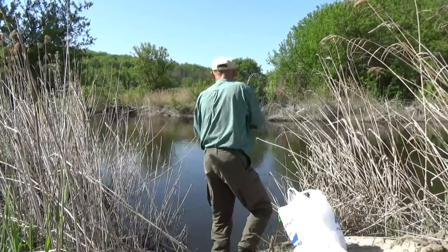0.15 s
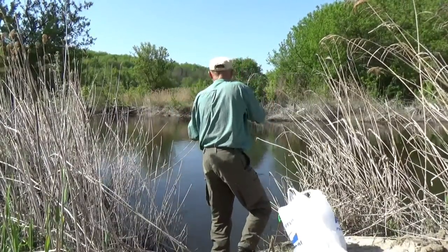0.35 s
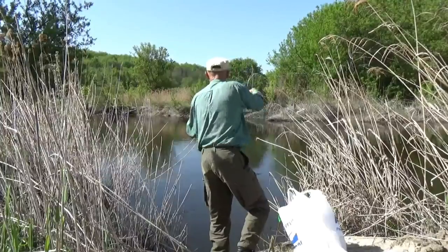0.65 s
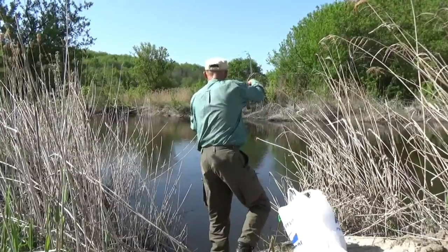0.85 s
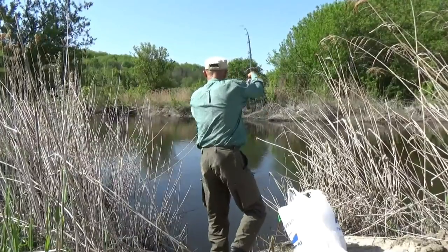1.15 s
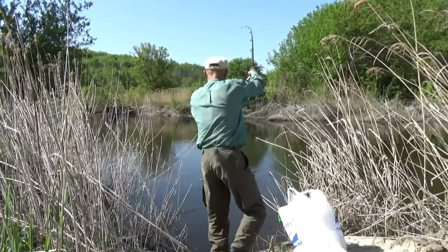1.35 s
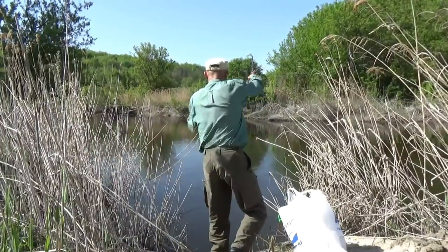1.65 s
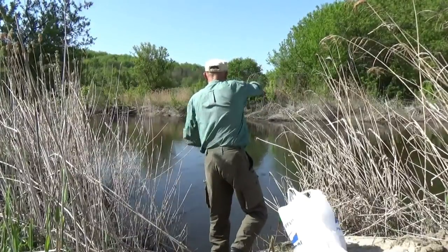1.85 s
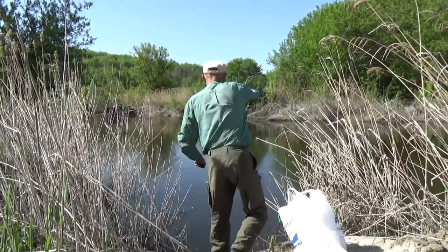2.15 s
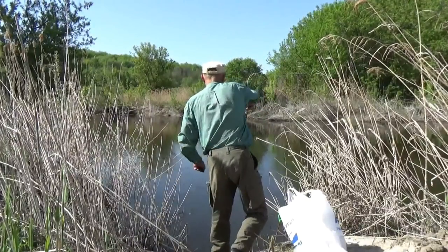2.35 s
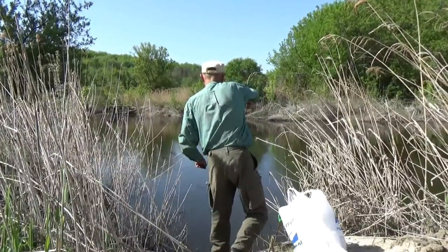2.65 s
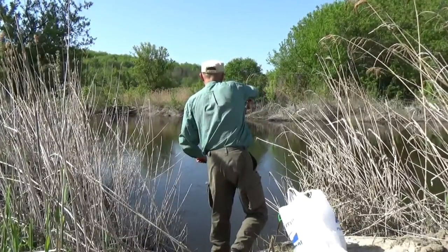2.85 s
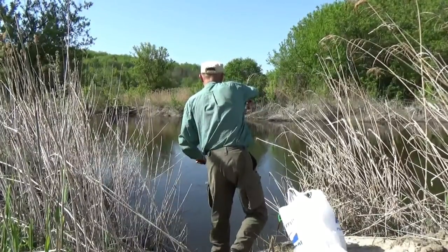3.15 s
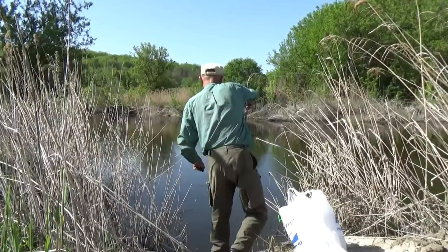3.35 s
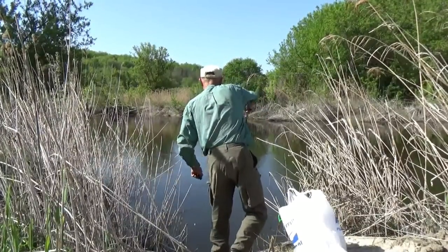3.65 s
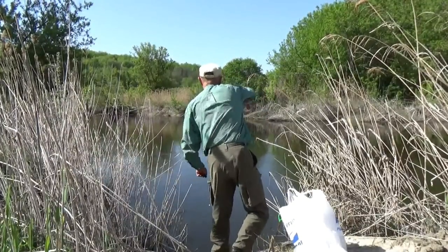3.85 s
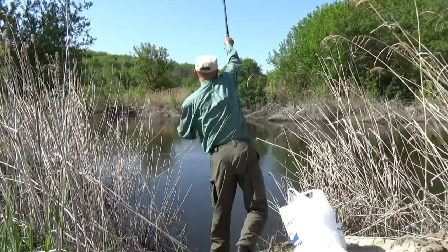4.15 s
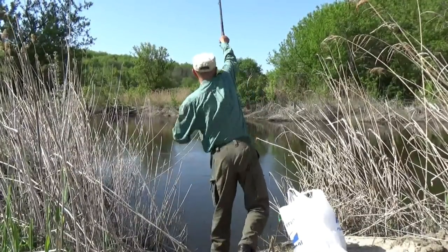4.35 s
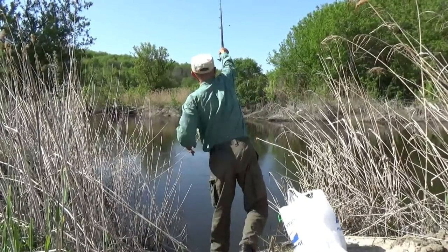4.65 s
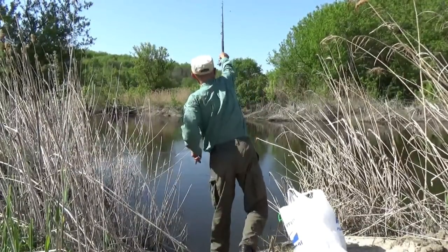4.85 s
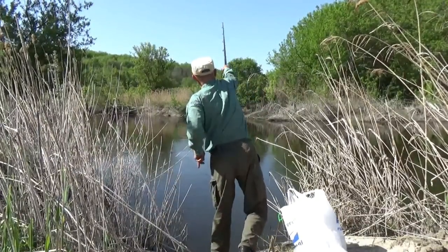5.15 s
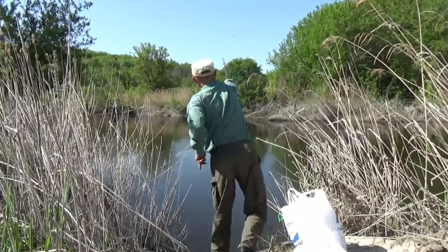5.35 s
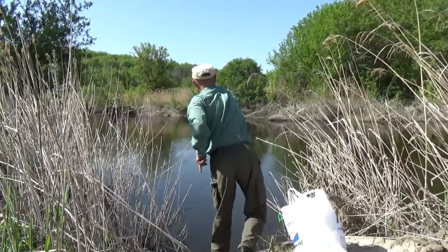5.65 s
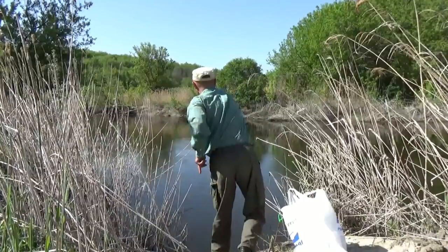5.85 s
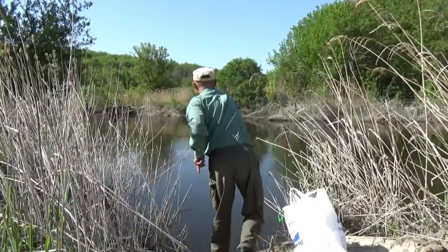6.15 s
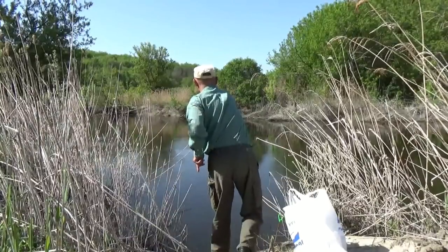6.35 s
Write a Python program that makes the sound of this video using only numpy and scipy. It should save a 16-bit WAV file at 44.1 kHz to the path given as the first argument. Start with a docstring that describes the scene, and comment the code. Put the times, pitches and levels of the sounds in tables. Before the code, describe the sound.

Faint chirps and a repeated piping bird call carry across a calm river, with a few ticks of dry reeds and low gusts on the microphone. Past the middle, a soft rod swish leads into the loudest sound, a nearby fishing reel clicking and rattling as line hisses off in spurts. It eases off into small water splashes, low thumps and plops near the bank.

```python
"""Birds chirp and pipe across a quiet river, over leaves, far water and light wind rumbling on the microphone.
Dry reeds tick and a few dull knocks sound. Near 4 s an angler strikes: the rod swishes up through the air,
and line rips off a clicking reel in bursts that shake its body. As the spool slows, its ring gives way to
splashing water, and bubbles plop near the bank."""
import sys
import numpy as np
from scipy import signal
from scipy.fft import rfft, irfft, next_fast_len
from scipy.io import wavfile
from scipy.ndimage import uniform_filter1d

SR = 44100
rng = np.random.default_rng(int(sys.argv[2]) if len(sys.argv) > 2 else 0)


def output_pcm(signal):
    """Save a mono or channel-first signal as 16-bit PCM at the path in sys.argv[1].

    Samples are clipped to [-1, 1] before scaling.
    """
    pcm = np.clip(np.atleast_2d(signal).T, -1, 1) * 32767
    wavfile.write(sys.argv[1], SR, np.round(pcm).astype(np.int16))


N = 287223
T = np.arange(N) / SR


def undb(db):
    return 10 ** (np.asarray(db) / 20)


def unit(x):
    return x / np.sqrt(np.mean(x ** 2))


def noise():
    return rng.standard_normal(N)


def curve(rows, off=-120):
    """One automation curve per level column; `off` dB outside the table's span."""
    times, *columns = np.transpose(rows)
    return [np.interp(T, times, column, left=off, right=off) for column in columns]


def colour(x, points):
    """EQ through (f/Hz, level/dB) points; white noise keeps its power."""
    hz, db = np.transpose(points)
    size = next_fast_len(N)
    bin_hz = np.arange(size // 2 + 1) * SR / size
    gain = undb(np.interp(np.log(bin_hz + 1), np.log(hz), db))
    return irfft(rfft(x, size) * unit(gain), size)[:N]


def band(x, lo_hz, hi_hz):
    return signal.sosfilt(signal.butter(2, [lo_hz, hi_hz], "band", fs=SR, output="sos"), x)


def ring(x, modes):
    """Parallel resonators of alternating polarity."""
    return sum((-1) ** k * undb(db) * signal.lfilter(*signal.iirpeak(hz, hz / width, SR), x)
               for k, (hz, width, db) in enumerate(modes))


def walk(rate):
    """Random modulator: slews to a new value `rate` times a second."""
    hold = int(SR / rate)
    return 0.71 * uniform_filter1d(np.repeat(rng.standard_normal(N // hold + 1), hold), hold)[:N]


def decays(times, db, t60):
    """Envelope that jumps at each time and dies away; overlaps add in power."""
    kicks = np.zeros(N)
    np.add.at(kicks, (np.asarray(times) * SR).astype(int), undb(2 * np.asarray(db)))
    return np.sqrt(signal.lfilter([1], [1, -np.exp(-2 * np.log(1000) / (t60 * SR))], kicks))


def wide(x, side_db):
    """Stereo spread: a delayed, flickering copy is added left and subtracted right."""
    side = undb(side_db) * walk(150) * np.roll(band(x, 300, 16000) + 0.5 * band(x, 2200, 9100), 30)
    return np.array([x + side, x - side])


def air():
    """A bed of leaves, far water and microphone hiss; a band near 1 kHz flutters."""
    # tone of the bed: f/Hz, level/dB
    spectrum = [(18, -47), (30, -30), (91, -6), (458, -0.5), (752, -2.5), (1040, -3), (1230, -5),
                (1360, -5), (2410, -8.5), (2660, -6.5), (4940, -11.5), (9890, -10), (11200, -13.5),
                (14600, -47), (22000, -120)]
    # treble ride: t/s, level/dB
    treble_ride = [(0.0, 3.5), (0.4, -.5), (1.25, 3), (1.7, -.5), (4.4, 0)]
    mid, side = (colour(noise(), spectrum) for _ in range(2))
    flutter = undb(-13 + 2.1 * walk(40)) * unit(band(noise(), 1003, 1058))
    bed = mid + flutter + undb(-12) * side * np.array([[1], [-1]])
    lift = undb(np.interp(T, *np.transpose(treble_ride))) - 1
    treble = lift * np.array([band(channel, 3800, 17000) for channel in bed])
    return undb(-55.5) * (undb(0.15 * walk(3.56)) * bed + treble)


def wind():
    """Gusts buffet the microphone ports with a lumpy rumble, nearly alike on both sides."""
    # gusts: t/s, deep level/dB, upper level/dB
    gusts = [(0.0, -61, -70), (0.2, -76, -63), (0.91, -51, -55), (1.09, -57.5, -50), (1.41, -57, -58.5),
             (1.67, -65, -61.5), (2.17, -73, -59.5), (2.66, -71, -69.5), (2.9, -64, -63),
             (3.14, -71.5, -68.5), (3.97, -73, -72), (4.06, -72, -56), (4.21, -62, -53), (4.57, -54, -52),
             (5.3, -54, -50), (5.55, -44.5, -53.5), (6.02, -45, -54), (6.15, -46, -43), (6.25, -61, -46),
             (6.51, -50, -53)]
    deep_db, upper_db = curve(gusts, off=-60)
    buffet_db = -39  # the sub grows twice as fast in dB as the deep band and meets it here

    def puff():
        lumps_db = 3.2 * walk(18)
        deep = undb(deep_db + lumps_db + 1.8 * walk(17)) * unit(band(band(noise(), 49, 132), 41, 158))
        sub = undb(2 * (deep_db - buffet_db) + buffet_db + lumps_db) * unit(band(noise(), 34, 54))
        upper = undb(upper_db + lumps_db + 1.3 * walk(27)) * unit(band(noise(), 95.5, 251))
        return sub + deep + upper
    return puff() * undb([[.4], [-.4]]) + undb(-17) * puff() * np.array([[1], [-1]])


def sing(notes, edge_s, waver, rasp_db, slur=0, slur_s=.008):
    """A bird's voice: gliding, trembling near-sine notes; slur drops in from above and droops the end."""
    out = np.zeros(N)
    pitch = 1 + waver * walk(400)
    strength = undb(2.1 * walk(60) + rasp_db * walk(500))
    for start, span, from_hz, to_hz, db, fade in notes:
        on = slice(int(start * SR), int((start + span) * SR))
        t = T[on] - start
        bend = slur * (np.exp((t - span) / slur_s) - np.exp(-t / slur_s))
        hz = (from_hz + (to_hz - from_hz) * (t / span + bend)) * pitch[on]
        envelope = np.clip(np.minimum(t, span - t) / edge_s, 0, 1) * undb(db - fade * t)
        out[on] += np.sqrt(2) * envelope * strength[on] * np.sin(2 * np.pi * np.cumsum(hz) / SR)
    return out


def birds():
    """Three singers, smeared by the trees across the water."""
    # falling chirps and steady piping: t/s, length/s, from f/Hz, to f/Hz, level/dB
    chirps = [(.005, 0.029, 4200, 4080, -59), (0.07, 0.041, 5850, 5760, -58), (.088, .02, 5700, 5000, -61),
              (0.098, .026, 4950, 4910, -57), (.205, 0.037, 6250, 5550, -61),
              (0.22, 0.033, 5650, 5050, -59), (0.242, 0.028, 4960, 4870, -58)]
    pipes = [(.105, .05, 2900, 2790, -67), (.335, .055, 2850, 2810, -65), (.575, .075, 2880, 2850, -68),
             (.805, .075, 2880, 2815, -64), (1.045, .07, 2870, 2800, -66), (1.265, 0.067, 2865, 2840, -66),
             (1.925, .058, 2550, 2550, -64), (2.108, .075, 2570, 2555, -64), (2.305, .07, 2600, 2580, -63),
             (2.502, .08, 2670, 2620, -60.5), (2.68, 0.098, 2675, 2620, -59.5),
             (2.883, 0.08, 2706, 2657, -58), (3.076, 0.083, 2700, 2660, -59),
             (3.285, 0.091, 2760, 2706, -60.5), (3.49, .08, 2736, 2666, -58),
             (3.699, 0.077, 2750, 2686, -58.5), (3.898, .09, 2770, 2690, -57),
             (4.107, 0.09, 2780, 2690, -57), (4.318, .095, 2850, 2700, -57.5)]
    # held whistles: t/s, length/s, from f/Hz, to f/Hz, level/dB, fade/(dB/s)
    whistles = [(.375, 0.31, 4645, 4620, -62.5, -11), (.62, 0.275, 4600, 4620, -65, 0),
                (1.37, 0.64, 2130, 2098, -70.5, 8)]
    song = sing([row + (0,) for row in pipes], edge_s=0.013, waver=0.0062, rasp_db=1.8, slur=1.5)
    song += sing(whistles, edge_s=0.029, waver=0.0046, rasp_db=1.5)
    song += sing([row + (0,) for row in chirps], edge_s=0.0075, waver=.015, rasp_db=5)
    t = T[:SR // 2]
    trees = rng.standard_normal(len(t)) * undb(-60 * t / .5) * (t > .02)  # 0.5 s tail, 20 ms pre-delay
    return song + undb(-7.5) * signal.fftconvolve(song, trees / np.linalg.norm(trees))[:N]


def reeds(t60=.018):
    """Dry stems snap against each other: a bright tick over a longer, lower body."""
    # ticks: t/s, level/dB, body against tick/dB
    ticks = [(0.9297, -47, -9), (1.036, -43.5, -8), (1.052, -42, -16), (1.6544, -49, -6),
             (1.9828, -49.5, 4), (2.3006, -56, 6), (2.85, -45, -21), (2.877, -48, -14),
             (2.9179, -38.5, -14), (3.0083, -44.5, -17), (3.5298, -43.5, -19)]
    times, db, body_db = np.transpose(ticks)
    snap = decays(times, db, t60) * np.sign(noise())
    body = decays(times, db + body_db, 2 * t60) * unit(band(noise(), 2140, 3600))
    return 1.54 * band(snap, 4000, 15000) + body


def knocks():
    """Soft blows with no pitch, heavy in the bass."""
    # blows: t/s, level/dB, top f/Hz, t60/s
    blows = [(2.28, -52, 200, 0.2), (3.657, -45.5, 324, 0.22), (3.681, -44, 390, 0.13),
             (6.018, -35, 146, 0.088), (6.107, -33, 700, 0.15), (6.121, -29, 487, 0.13),
             (6.174, -27, 2780, 0.046)]
    out = np.zeros(N)
    for start, db, top_hz, t60 in blows:
        envelope = uniform_filter1d(decays([start], [db], t60), size=200)
        thud = unit(band(band(noise(), 78, top_hz), 60, top_hz))
        bass = 0.75 * unit(band(noise(), 56, 174))
        out += envelope * (thud + bass)
    return out


def swish(peak_s=4.145, peak_db=-49, flick_width=0.23):
    """Air torn by the rod swells and dies away; the lifting line flicks over it."""
    # line flicks: peak t/s, f/Hz, level/dB, slope either side/(dB/s)
    flicks = [(4.11, 1550, -53, 200), (4.18, 1600, -58, 300), (4.387, 1460, -50, 900),
              (4.407, 1300, -52, 700)]
    swell_db = np.where(T < peak_s, 62 * (T - peak_s), 46 * (peak_s - T))
    rush = unit(band(noise(), 5400, 18000)) + 0.42 * unit(band(noise(), 900, 3900))
    out = undb(peak_db + swell_db) * rush
    for time, hz, db, slope in flicks:
        whip = unit(band(noise(), hz * (1 - flick_width), hz * (1 + flick_width)))
        out += undb(db - slope * np.abs(T - time)) * whip
    return out


def reel(splash_s=5.35, slap_s=5.75, small_clicks_per_s=70, slack_loss=0.57):
    """Each click is a crack and a gritty rattle; running line hisses in the gaps; the reel body rings."""
    # clicks: t/s, crack level/dB, rattle against crack/dB
    clicks = [(4.4867, -22, -9), (4.495, -7, -11.5), (4.5262, -22, -5), (4.5563, -11.5, -18),
              (4.5617, -6, -12), (4.5815, -23, -6), (4.5971, -35, -16), (4.6126, -19, -3),
              (4.6176, -8, -13), (4.625, -12.5, -9.5), (4.664, -9.5, -11.5), (4.6685, -6.5, -8),
              (4.6993, -29, -16), (4.7084, -9.5, -12.5), (4.7435, -23, -2), (4.7507, -4.5, -16),
              (4.7586, -17, -2), (4.7828, -12, -9), (4.7882, -10, -14), (4.793, -9.5, -5),
              (4.8248, -17, -4), (4.8307, -3.5, -19), (4.837, -9.5, -9), (4.874, -14, -23),
              (4.878, -9.5, -6.5), (4.917, -23, -11), (4.927, -13.5, -4.5), (4.9704, -18, -7),
              (4.9755, -9, -13), (4.9822, -18, -7.5), (5.0182, -12.5, -10), (5.0239, -6, -11),
              (5.042, -18, -10), (5.0648, -25, -4), (5.084, -13.5, -12), (5.0966, -21.5, -3),
              (5.1087, -19.5, -6.5), (5.1712, -14, -8), (5.1805, -15.5, -19), (5.1864, -18, -12.5),
              (5.194, -18.5, -10.5), (5.2452, -24, -14), (5.258, -26.5, -8), (5.2647, -18.5, -9.5),
              (5.2727, -25, -14), (5.3544, -26.5, -8), (5.37, -30.5, -0.5), (5.3914, -28, -2),
              (5.527, -32, -4.5), (5.536, -32, -8), (5.5454, -28, -8), (5.712, -37, -4.5), (5.767, -35, -2),
              (5.8877, -28.5, -2), (5.9067, -21, -8), (6.0215, -33.5, -7), (6.0303, -27, -5),
              (6.0459, -25, -7), (6.091, -27.5, -12), (6.118, -26.5, -4.5), (6.1273, -28, -2.5),
              (6.186, -24.5, -4.5), (6.1953, -22, -6.5), (6.201, -25.5, -1), (6.239, -29, 2.5),
              (6.244, -27, 1.5), (6.321, -36, -6), (6.3282, -25, 0), (6.4132, -29.5, -1),
              (6.423, -23.5, -4.5), (6.4306, -27.5, -0.5)]
    # running line: t/s, hiss level/dB, lower rattle level/dB
    line_run = [(4.49, -63, -45.5), (4.55, -36.5, -38.5), (4.71, -34.5, -39), (4.81, -34, -40),
                (5.03, -33.5, -38), (5.15, -45.5, -48.5), (5.21, -42, -42), (5.24, -54, -51.5),
                (5.26, -40, -48), (5.34, -46.5, -49), (5.51, -50.5, -46), (5.55, -42, -44.5),
                (5.6, -50.5, -49.5), (6.01, -47.5, -46), (6.12, -42.5, -38.5), (6.15, -58, -47),
                (6.17, -40.5, -38.5), (6.25, -37.5, -37), (6.34, -43.5, -39), (6.51, -46.5, -44.5)]
    # tone of clicks and hiss: f/Hz, level/dB
    click_eq = [(2350, -100), (4000, -15.5), (5340, -12.5), (6940, -1.5), (8990, -1.5), (9840, 2.5),
                (10600, 0.5), (11200, -8), (14600, -4), (22000, -120)]
    # resonances of the reel body and of the singing slack line: f/Hz, width/Hz, level/dB
    body_modes = [(493.5, 33, -8.5), (530, 18, -6.5), (630, 51, -4), (1070, 250, -1.5), (1416, 60, 1.5),
                  (1670, 100, -1.5), (2047, 74, 6.5), (3050, 1850, -4), (4130, 170, -4)]
    slack_modes = [(8870, 280, 3), (6950, 270, -21)]
    # hum of the reel body: t/s, level/dB
    hum_ride = [(4.49, -58), (4.55, -37.5), (4.63, -38), (4.67, -29.5), (4.72, -36.5), (4.9, -37),
                (5.03, -31.5), (5.15, -47.5), (5.26, -40), (5.33, -54), (6.01, -66), (6.14, -43),
                (6.25, -55), (6.51, -62)]
    times, crack_db, tail_db = np.transpose(clicks)
    hiss_db, run_db = curve(line_run)
    hum_db, = curve(hum_ride)
    # as the spool slows, its ring crossfades to the slap of line and water
    wet = np.clip((T - splash_s) / 0.081, 0, 1)

    # small random clicks ride on the hiss, 5 dB softer once the splashing starts
    when, size = rng.random((int(small_clicks_per_s * N / SR), 2)).T
    small_s = when * N / SR
    small_db = hiss_db[(when * N).astype(int)] + 6 - 4 * np.log(size + 0.055) - 5 * (small_s > splash_s)
    crack = decays(np.r_[times, small_s], np.r_[crack_db, small_db], t60=.007) * np.sign(noise())
    rattle_envelope = uniform_filter1d(decays(times, crack_db + tail_db, t60=.065), size=100)
    rattle = rattle_envelope * unit(undb(3 * walk(600)) * noise())
    hiss = undb(hiss_db + 4.8 * walk(67)) * unit(undb(2.6 * walk(500)) * noise())
    sizzle = 0.69 * wet * ring(hiss + rattle, slack_modes)
    bright = colour(crack + rattle + hiss + sizzle, click_eq)
    bright -= slack_loss * wet * band(bright, 3400, 6400)  # slack line sounds duller
    bite = undb(-17) * (1 - wet) * band(crack, 1200, 5000)

    # the midrange grows more slowly than crack and rattle; late clicks also slap the water
    body = np.sqrt(1 - wet) * unit(ring(noise(), body_modes[3:])) + np.sqrt(wet) * splash()
    ring_db = -22.5 + 0.71 * crack_db + 0.36 * tail_db + 6 * (times > slap_s)
    mids = body * undb(1.1 * walk(200)) * (decays(times, ring_db, t60=0.049) + undb(run_db + 3 * walk(40)))
    shake = undb(hum_db + 3 * walk(45)) * noise() + undb(-16) * (1 - wet) * (crack + rattle)
    hum = undb(22) * ring(ring(shake, body_modes[:3]), [(596, 510, 0)])
    return bright + bite + mids + hum


def splash():
    """Droplets over a wash whose resonances come and go one by one."""
    # resonances of the wash: f/Hz, width/Hz, level/dB
    wash_modes = [(1110, 400, -4), (1800, 400, -3), (2850, 1400, -1.5), (4130, 750, -18)]
    wash = sum(undb(4 * walk(14)) * ring(noise(), [mode]) for mode in wash_modes)
    return undb(-7.5) * spray() + undb(-3) * unit(wash)


def spray(count=2500, drop_samples=400):
    """Droplets: a few rising cycles each, at random pitch and size."""
    when, pitch, size = rng.random((count, 3)).T
    t = T[:drop_samples]
    hz = 950 * 4.5 ** pitch[:, None]
    envelope = undb(-3 * np.log(size[:, None] + 0.0013) - 15 * hz * t)
    drops = envelope * np.sin(2 * np.pi * hz * t * (1 + 8 * t))
    out = np.zeros(N + drop_samples)
    np.add.at(out, (when * N).astype(int)[:, None] + np.arange(drop_samples), drops)
    return unit(out[:N])


def bubbles():
    """A pocket of air rings unevenly, rises in pitch as it nears the surface, and bursts."""
    # plops: t/s, f/Hz, relative glide/(1/s), level/dB, t60/s
    plops = [(5.888, 2850, 5, -28, 0.032), (6.046, 2570, 4, -32.5, .03), (6.091, 1330, 8, -19.5, 0.016),
             (6.107, 1500, 4, -26, 0.031), (6.141, 192, 2.2, -33, 0.17), (6.166, 319, 1.8, -14, 0.042),
             (6.176, 190, 16, -7.5, 0.12), (6.178, 1605, 4.5, -16.5, 0.02), (6.183, 1104, 11, -24.5, 0.11),
             (6.206, 345, 11.8, -19, 0.058), (6.282, 1110, 6, -33, .03), (6.292, 1090, 6, -34, 0.027),
             (6.319, 1440, 6.6, -37, .03), (6.329, 4060, 4, -35, .03), (6.355, 1350, 6.9, -28.5, .04),
             (6.424, 2580, 4.4, -29, 0.024)]
    out, wobble = np.zeros(N), walk(250)
    for start, hz, glide, db, t60 in plops:
        t = np.clip(T - start, 0, t60)
        attack = 1 - np.exp(-t * hz / 0.9)
        burst_gate = np.clip((0.4 * t60 - t) / (0.12 * t60), 0, 1)
        shaky = min(hz / 1000, 1) * wobble  # small pockets are the least steady
        tone = np.sin(2 * np.pi * hz * t * (1 + glide * t / 2) + .4 * shaky)
        out += undb(db - 60 * t / t60 + 1.5 * shaky) * attack * burst_gate * tone
    return out


def scene():
    """Tackle in the centre, plops and knocks a touch left, reeds wide, the riverbank all around."""
    tackle = wide(reel() + swish(), side_db=-13.5)
    bank = wide(bubbles() + knocks(), side_db=-13) * undb([[.7], [-.7]])
    return tackle + bank + wide(reeds(), side_db=-5.5) + wide(birds(), side_db=-13) + air() + wind()


def record(dry):
    """The camera cuts the top steeply above 11 kHz."""
    return signal.sosfilt(signal.ellip(10, .2, 60, 11050, fs=SR, output="sos"), dry)


dry = scene()
out = record(dry)
output_pcm(out)
```